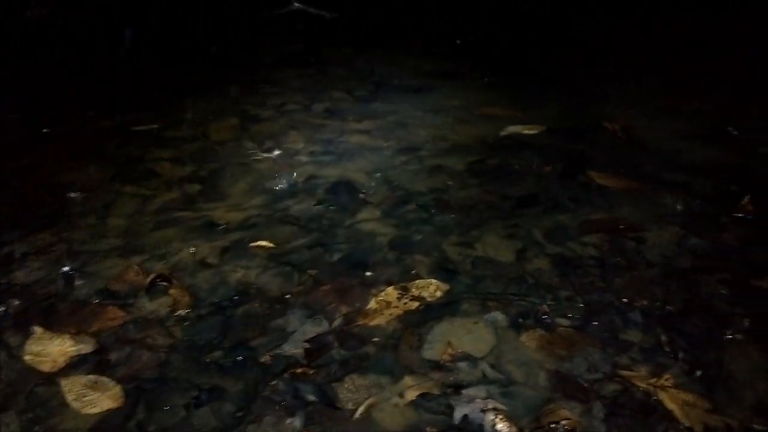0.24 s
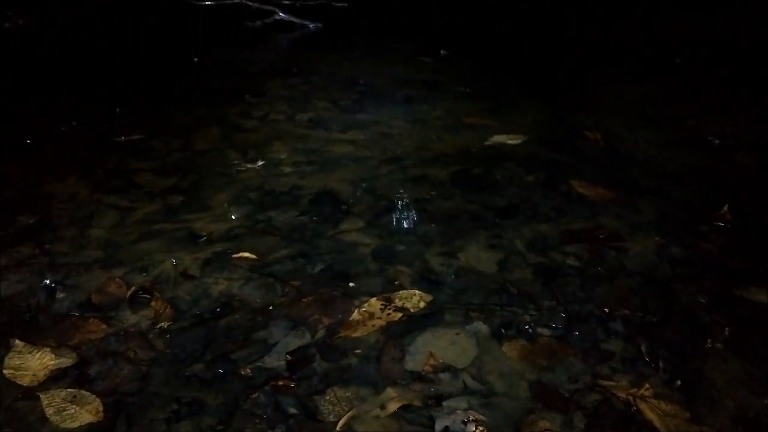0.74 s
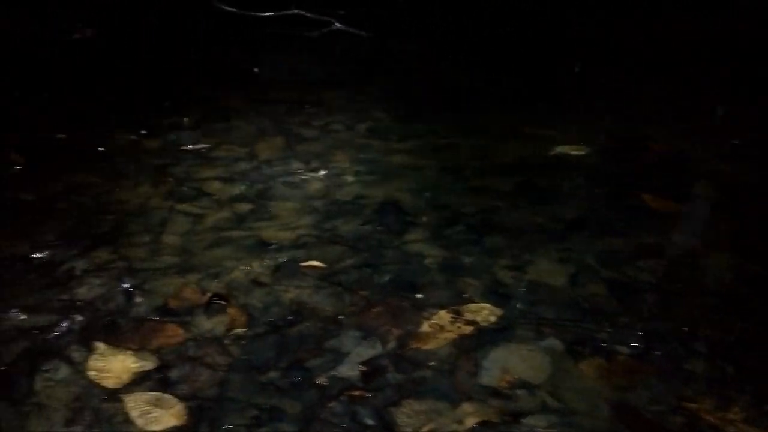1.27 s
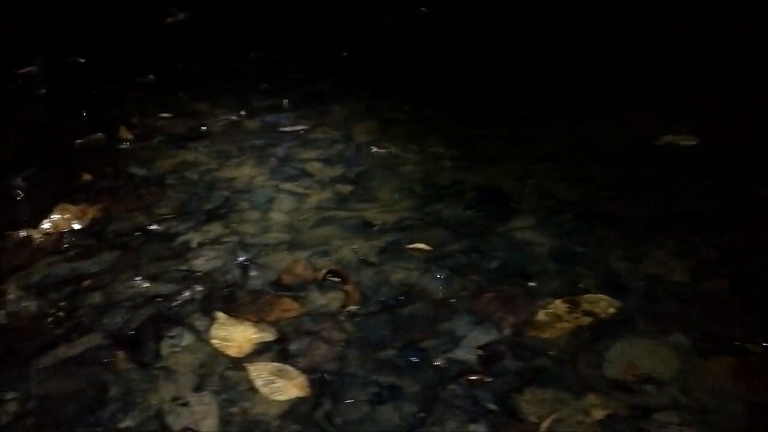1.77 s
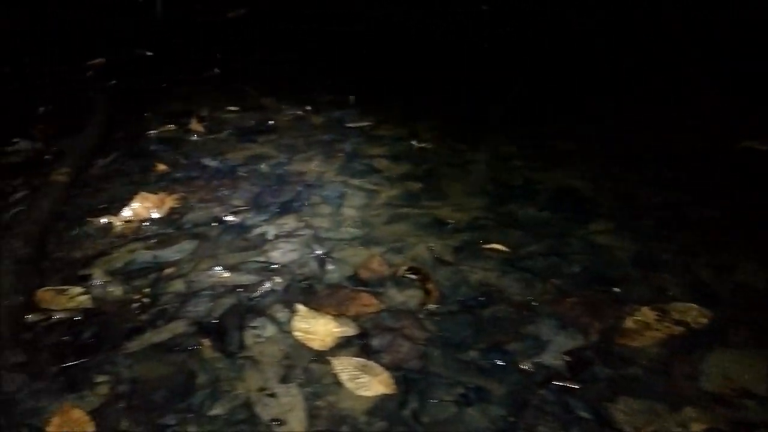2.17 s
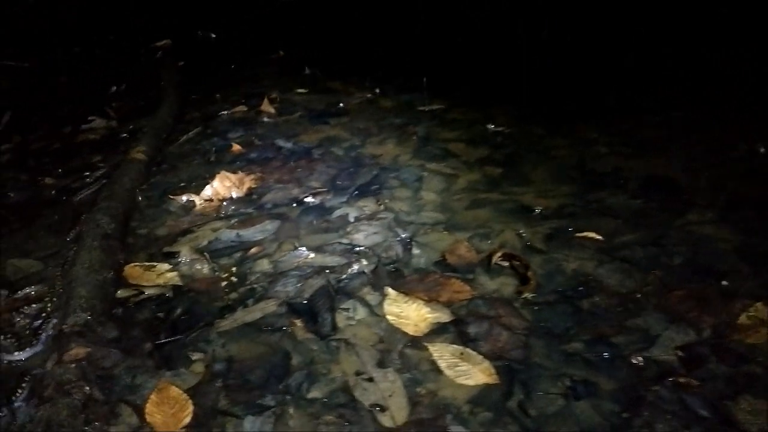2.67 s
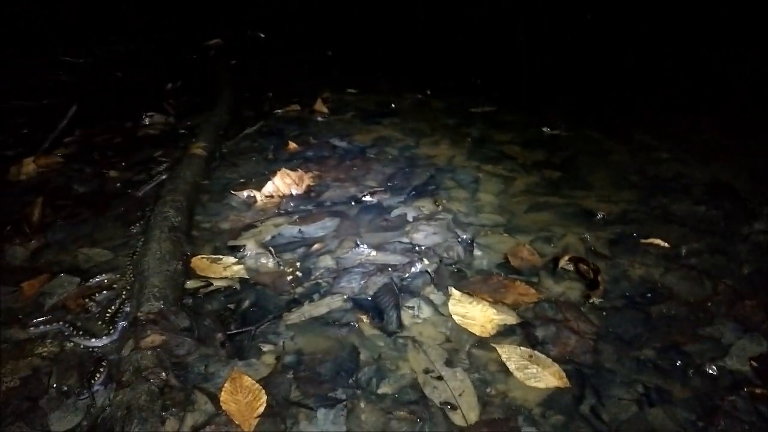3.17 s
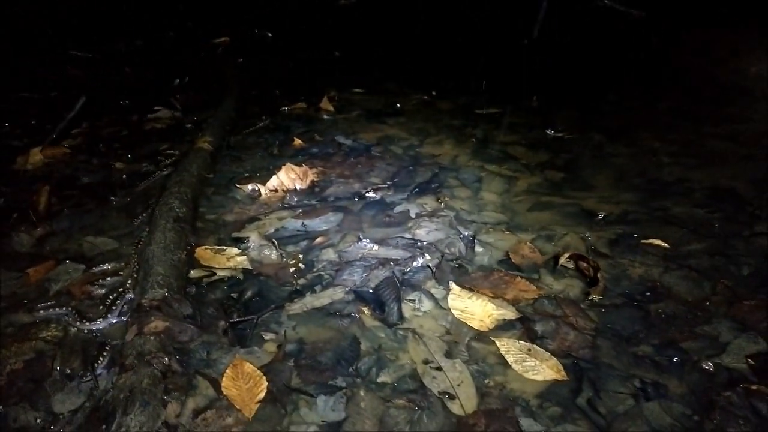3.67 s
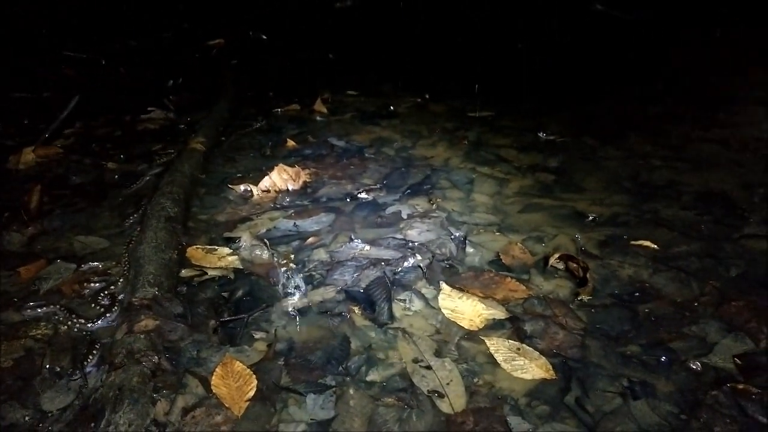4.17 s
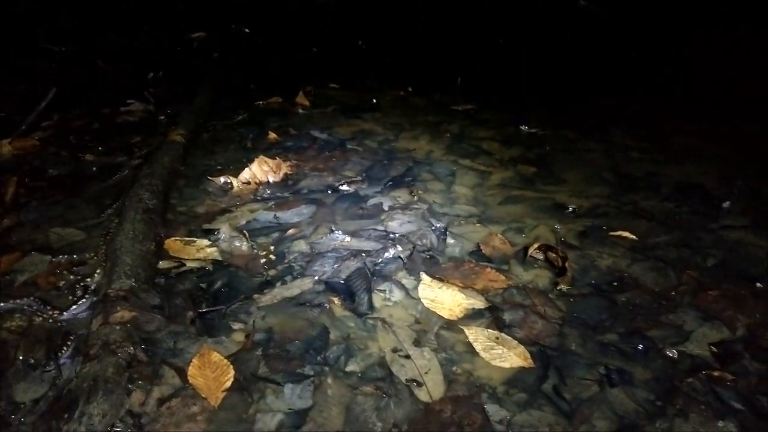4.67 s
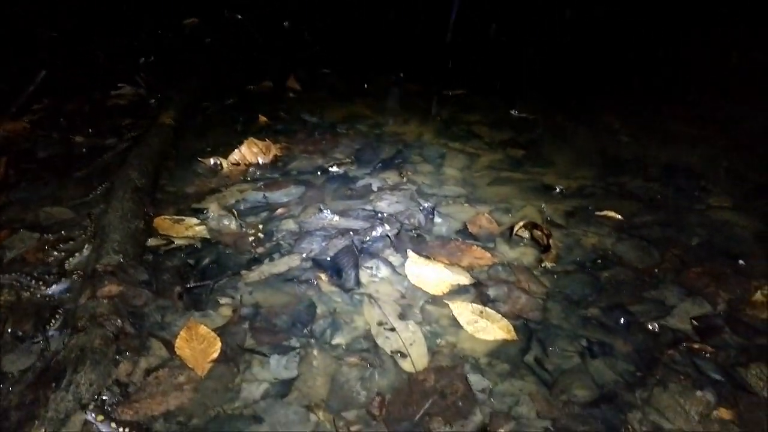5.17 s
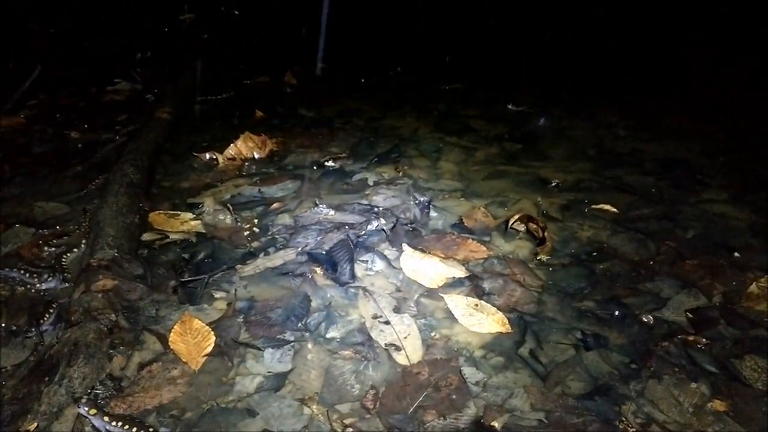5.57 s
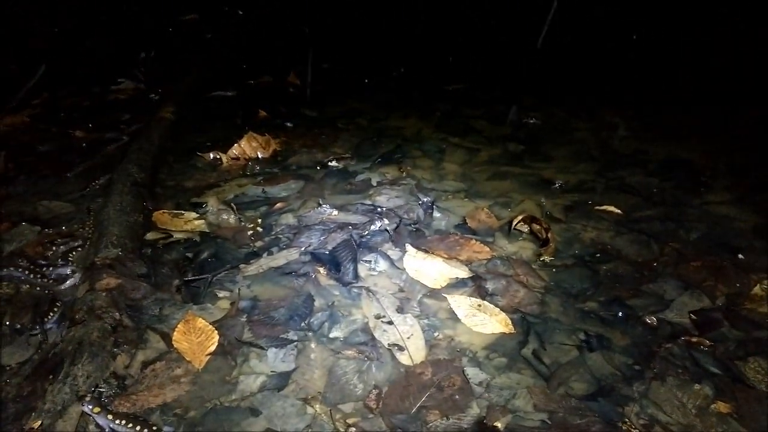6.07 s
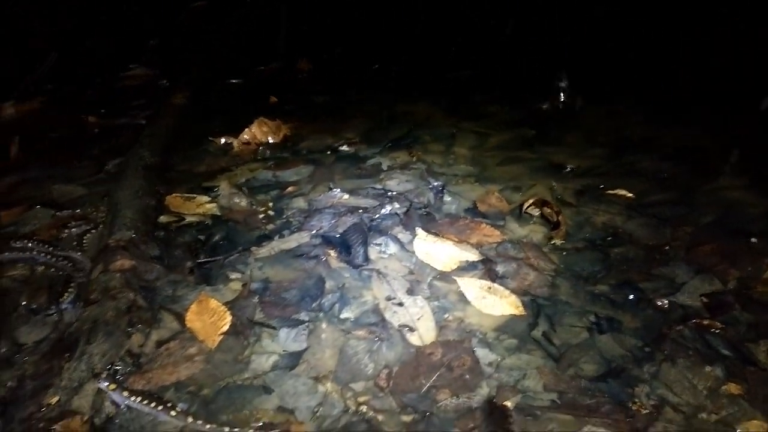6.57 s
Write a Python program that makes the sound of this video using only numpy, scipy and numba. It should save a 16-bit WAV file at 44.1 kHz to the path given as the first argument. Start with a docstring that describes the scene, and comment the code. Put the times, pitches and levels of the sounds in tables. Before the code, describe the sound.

Wood frogs chuckle in short throaty clucks at a woodland pool at night while raindrops tick and thud close by over soft pattering rain.

```python
"""A soft hiss, a low distant rumble and pattering fine rain come first, with a faint murmur; then drops
tick and thud close by, and wood frogs chuckle at a woodland pool at night, others fainter.
The hiss is banded noise, the patter a spray of tiny tones, and each drop a burst of ringing impacts.
Each chuckle is a short run of throat pulses ringing the vocal sacs; each near note has its own
left-right lag, as a hand-held phone slowly turns. Echoes from the woodland follow frogs and drops."""
import sys
import numpy as np
from scipy import signal
from scipy.io import wavfile
from scipy.ndimage import uniform_filter1d
from numba import njit

SR = 44100
rng = np.random.default_rng(int(sys.argv[2]) if len(sys.argv) > 2 else 0)


def bounce(signal):
    """Save signal as a 16-bit WAV file at the path given by the first command-line argument."""
    frames = np.transpose(np.atleast_2d(signal))
    limited = np.clip(frames, -1, 1)
    pcm = np.round(limited * 32767).astype(np.int16)
    wavfile.write(sys.argv[1], SR, pcm)


N = 301203  # length in samples

# Far rain and rumble, loudness across pitch: f/Hz, relative level/dB per Hz
HISS_COLOUR = [(18, -46), (30, -16), (84, 3.5), (112, 6.5), (313, -6), (691, -1), (789, -5), (1080, -2.5),
               (1650, -0.5), (4860, -12), (6000, -9), (7410, -4), (8600, -11.5), (9650, -18.5), (11900, -7),
               (13300, -19.5), (15600, -28), (16400, -70)]
HISS_DB = -54  # average level of the whole wash
# How alike left and right are in the wash: f/Hz, likeness (1 same, -1 opposite)
ALIKE = [(30, 0.6), (70, 0.98), (140, 0.92), (300, 0.71), (700, 0.25), (1400, -0.5), (3000, 0.46),
         (15000, 0.59)]
# How rain leans to one side: f/Hz, left minus right/dB
RAIN_LEAN = [(3000, -0.5), (5000, 5), (8000, -9.5), (15000, -1)]
# Slow rise and fall of the weather; only changes about the middle value count:
# t/s, rain level/dB, rumble level/dB
WEATHER = [(0.0, -54.5, -58.5), (0.36, -56, -66), (0.7, -56.5, -62.5), (0.84, -55, -60), (1.43, -58.5, -67),
           (1.84, -57, -65.5), (2.28, -57.5, -65), (2.85, -57, -64.5), (3.31, -58.5, -67), (3.73, -56, -67),
           (4.43, -58, -62.5), (4.6, -58.5, -59), (5.1, -56.5, -65.5), (5.95, -57.5, -61),
           (6.37, -56, -63.5), (6.56, -54, -55.5), (6.83, -57, -62.5)]

# Soft lead-in murmurs with the mouth shut:
# t/s, length/ms, base level/dB, base f/Hz, glide over the note/%, left lags by/ms
MURMURS = [(0.0, 60, -51.5, 363, -8.5, -0.2), (0.297, 42, -47, 401, -10, -0.27),
           (0.585, 65, -42, 330, 18, -0.25), (0.882, 46, -35.5, 336.5, 1, -0.26),
           (1.228, 34, -48.5, 349, -43, 0.16), (1.85, 47, -54, 317, 1, -0.067),
           (5.075, 62, -53.5, 299.5, -7, 0.43), (5.48, 34, -51.5, 322, -29, 0.39),
           (5.825, 63, -40.5, 334, -14.5, 0.16)]
# Tones stacked in each murmur: multiple of its pitch, level/dB
MURMUR_PARTIALS = [(1, -23), (2, -1), (3, -5), (4, -6.5)]
MURMUR_PEAK = 0.61  # loudest at this share of the length
MURMUR_ARCH_PERCENT = 2.9  # pitch bulge in the middle

# Near drops: t/s, tick level/dB, thud level/dB, snap level/dB, snap f/Hz, crack level/dB,
# left minus right of the treble/dB
DROPS = [(0.059, -26.5, -21.5, -31.5, 3180, -31, -17), (0.0654, -46, -42, -48, 3540, -55, -3),
         (0.1097, -47, -48, -50, 2200, -40, -7), (0.1688, -28, -19.5, -30, 3160, -36, -3),
         (0.1825, -38, -45, -39.5, 2460, -42, -5), (0.249, -64, -53, -48.5, 2170, -70, -2),
         (0.4195, -42, -46, -42.5, 2690, -44, -5), (0.4378, -40, -46, -46, 5190, -41.5, -9),
         (0.4738, -44, -56, -47, 5770, -42, -10), (0.4997, -47, -51, -45, 2420, -45, 10),
         (0.5076, -40, -60, -52, 4300, -38, -15), (0.5583, -43, -49, -50, 2210, -48, -8),
         (0.5758, -49.5, -54.5, -47.5, 3900, -63, -5), (0.6811, -54, -33, -58, 5710, -43, -5),
         (0.7236, -46, -44, -36, 2200, -47, 7), (0.7446, -36, -23, -42, 2180, -43, -12.5),
         (0.786, -58, -30, -55, 2930, -57, -6), (0.8267, -45, -41, -53, 2420, -47, -11),
         (0.835, -44, -47, -52, 2660, -43, -7), (0.8517, -44, -52, -47, 2420, -51, -11),
         (0.8644, -47, -50, -43.5, 2200, -51, -14), (0.9122, -49, -38, -43.5, 3900, -34, -5),
         (0.936, -40, -37.5, -47, 3900, -44, -1), (0.9699, -39.5, -37, -41.5, 3520, -44, -4),
         (1.0626, -42, -75, -55, 5710, -41, -4), (1.176, -71, -44, -53.5, 5740, -59, -22),
         (1.477, -44, -50, -39.5, 2400, -51, 0), (1.5968, -46, -47, -53, 5670, -50, -11),
         (1.6168, -51, -73, -55, 5710, -52, -17), (1.6288, -38.5, -39, -50, 2930, -48, -11),
         (1.677, -27, -23.5, -41, 5740, -36, -8.5), (1.751, -39, -58, -55, 5710, -43, -14),
         (1.796, -49, -51, -44.5, 2950, -63, -6), (1.9038, -47, -56, -47, 2680, -47, -10),
         (1.944, -36, -32, -48, 3960, -41.5, -9), (2.086, -41, -46, -54, 5710, -44, -7),
         (2.093, -38.5, -43, -62, 4720, -31, -2), (2.1433, -33, -47, -42, 4230, -42, -3),
         (2.1547, -43, -60, -61, 4290, -51, -11), (2.1873, -56, -38, -60, 2420, -53, -9),
         (2.225, -48, -39, -59, 3900, -59, -6), (2.5476, -39.5, -54, -39.5, 3040, -43, -7),
         (2.555, -43, -57, -63, 2660, -46, -4), (2.5824, -45, -43, -57, 5710, -60, -15),
         (2.59, -42, -61, -48, 5190, -48, 0), (2.6286, -44, -41, -48, 2200, -44, -9),
         (2.6361, -43, -55, -51, 2420, -42, -10), (2.7035, -34.5, -86, -42.5, 4720, -60, -15),
         (2.7263, -47, -62, -45, 5660, -35, 0), (2.7332, -33.5, -72, -35, 3760, -45, -8),
         (2.7455, -43, -45, -45, 5600, -37, -5), (2.8782, -39.5, -43.5, -56, 5710, -36.5, 0),
         (2.9242, -37, -55, -53, 4330, -33, 2), (2.9716, -52, -67, -42, 2200, -56, -7),
         (3.0082, -47, -35.5, -48.5, 2200, -50, -12), (3.039, -43.5, -40, -66, 2660, -43, -5),
         (3.3966, -39, -54, -44.5, 5710, -42, -3), (3.4351, -40.5, -58, -61, 5710, -35, -2),
         (3.4531, -37, -66, -45.5, 3270, -31.5, -5), (3.5864, -45, -38.5, -41.5, 3660, -45, -6),
         (3.596, -44, -49, -65, 5710, -49.5, -11), (3.6257, -60, -44, -68, 4290, -63, -4),
         (3.6315, -46, -52, -50, 2430, -53, -11), (3.6623, -43, -46, -58, 5710, -57, -13),
         (3.8105, -39, -59.5, -64, 5710, -41, -4), (3.817, -42, -59, -65, 5710, -54.5, -2),
         (3.823, -37, -64, -54, 4720, -38, -9), (3.9455, -61, -58, -46.5, 3860, -60, -4),
         (4.0522, -46, -52, -44, 2200, -61, -7), (4.0931, -33, -23.5, -50, 5600, -41, -9),
         (4.1548, -46, -68, -51, 3220, -52, -13), (4.1816, -44, -54, -47, 2200, -42, 1),
         (4.1987, -46, -25.5, -46, 3540, -51, -13), (4.212, -58, -66, -38, 2240, -59, -9),
         (4.2439, -28.5, -27, -34, 5740, -33, -9), (4.286, -43, -39, -44, 5710, -54, 0),
         (4.4738, -43, -50, -61, 4290, -53, -4), (4.4894, -42, -59, -51, 5710, -54, -5.5),
         (4.5445, -19, -20.5, -26, 2300, -26, -13), (4.6248, -50, -48, -50, 5710, -53, -1),
         (4.6697, -41, -40, -38, 2180, -55, -10), (4.712, -44, -40, -46, 2930, -47, -11),
         (4.754, -50, -34, -52, 2200, -51, -13), (4.773, -51, -37.5, -44.5, 2210, -56, -7),
         (4.8097, -34.5, -39.5, -38.5, 5670, -39, -1), (4.9389, -29, -25.5, -40, 5500, -33, -3),
         (5.0916, -33, -56, -49, 5710, -43, -12), (5.1134, -38, -48, -52.5, 3900, -57, -4),
         (5.1898, -41, -42, -52, 5740, -48, -6), (5.274, -64, -44, -50, 3220, -60, -7),
         (5.2895, -48, -44, -46, 5710, -47, 0), (5.2973, -35, -49, -44, 2200, -42, -1),
         (5.368, -52, -60, -48, 2420, -60, -4), (5.4044, -35, -51, -40, 5640, -48, -1),
         (5.4263, -43, -52, -45, 3540, -41, -6), (5.5132, -42, -44, -46, 5800, -39.5, 2),
         (5.773, -47, -36.5, -53, 5190, -57, -12), (5.8506, -44, -47, -52, 3500, -44, -5),
         (5.876, -45, -46, -49, 5140, -51, -3), (6.0437, -45.5, -36.5, -36.5, 2930, -46, -22),
         (6.0839, -41, -53, -37, 3780, -36, -5), (6.1925, -35, -42, -46.5, 5900, -32.5, -10),
         (6.212, -47, -64, -54.5, 4720, -41, 5), (6.247, -68, -61.5, -72, 3220, -48, -11),
         (6.3035, -42, -46, -44.5, 2680, -46, 1), (6.3136, -42.5, -52, -59, 2200, -59, -14),
         (6.3654, -39, -47, -37.5, 3900, -42, -1), (6.3758, -45, -42, -38.5, 2160, -54, -14),
         (6.4214, -31, -27, -55, 5710, -26.5, 3), (6.4428, -23, -22, -37, 2220, -36, -7),
         (6.4807, -23.5, -20.5, -29.5, 2620, -32, -8.5), (6.5177, -38, -45, -43, 2200, -52, -14),
         (6.5335, -39, -43, -51, 2420, -51, -2), (6.5476, -36, -43, -47, 2200, -31.5, -9),
         (6.6535, -26, -38, -41, 5710, -32, -6), (6.7215, -27, -54, -42.5, 5710, -37.5, -6.5),
         (6.7335, -42, -60, -44.5, 3500, -47, -17)]
# Ways a struck wet surface rings, from sharp tick to deep thud, knock and bright crack:
# f/Hz, level within the kind/dB, time to fade by 60 dB/ms
TICK = [(6500, -7, 8.4), (7130, 8, 3.46), (7860, 7.5, 3.63)]
THUD = [(113, -17.5, 14.7), (263, -36, 3.3), (387, -11, 16.7), (540, -5, 12.4)]
KNOCK = [(744, -0.41, 15), (1410, 0.34, 15), (1950, 0.65, 8.3)]
CRACK = [(10220, 14, 1.64), (11800, 16, 1.53), (14000, 0, 1.1), (15200, 1, 1.5)]
# Snap ringing: multiple of the drop's snap f, level within the kind/dB, time to fade by 60 dB/ms
SNAP = [(0.8, 16, 2.6), (1.0, 12, 5.23), (1.27, 17, 1.9)]
DROP_LAG_MS = -0.19  # left lags by this, before scatter
DROP_TAIL_T60_S, DROP_TAIL_DB = 0.056, -7

# Near frog notes: t/s, length/ms, base level/dB, base pulse rate f/Hz, high ring f/Hz,
# high ring over low ring level/dB, left lags by/ms, level change over the note/dB,
# rasp f/Hz, rasp base level/dB
NOTES = [(0.068, 20, -38, 376.0, 1250, 11, -0.23, -2, 3800, -54),
         (0.12, 24, -27.5, 435.5, 1330, 9.0, -0.22, -7.5, 3230, -46),
         (0.353, 22.5, -40, 265, 1210, 6, -0.23, -2.5, 3430, -57),
         (0.414, 27.6, -27.5, 421.0, 1334, 10.5, -0.25, -11, 3820, -46),
         (0.499, 24, -46, 475, 1340.0, 27.0, -0.41, -3, 2680, -55),
         (0.67, 16.6, -29.0, 264.4, 1380, 11, -0.28, -2, 2800, -52),
         (0.72, 18.6, -21.5, 441.5, 1390, 12.5, -0.23, -10.5, 2930, -38),
         (0.7602, 13, -31.0, 221.5, 1330, 7, 0.04, 0, 2720, -59),
         (0.821, 29, -25.0, 402, 1260, 13, 0.093, -9, 2750, -51),
         (0.862, 34, -47, 377.5, 1330.0, -7.0, -0.23, -2, 2900, -55),
         (0.925, 9.2, -31, 295, 1400.0, 12, -0.35, -1, 3500, -60),
         (0.959, 17, -23.5, 261, 1360, 17, -0.24, -3.5, 2800, -53),
         (1.002, 25.0, -18, 443, 1670, 13, -0.22, -14.5, 3060, -31),
         (1.09, 25, -47.5, 394, 1340, 7.0, -0.19, 0, 3300, -50),
         (1.271, 33.0, -37.0, 352, 1370.0, 13, -0.32, -4, 3520, -57),
         (1.298, 35.0, -31, 413.7, 1380.0, 15, 0.22, -5.5, 3000, -50.5),
         (1.497, 44.0, -53.0, 407, 1200, 7.0, -0.08, 0.5, 3800, -56),
         (1.572, 16.3, -51.5, 408, 1400.0, 3, -0.083, -4, 3100, -57),
         (1.622, 21.4, -49, 427.0, 1210, 5, 0.01, -4, 2900, -54),
         (1.684, 24.8, -31, 405, 1264, 7.5, 0.073, -7.5, 3620, -47),
         (1.936, 9.9, -40, 268, 1410.0, 4, 0.029, 1, 3770, -63),
         (1.993, 26.5, -29, 420.5, 1420, 13.5, -0.077, -7.5, 2770, -53),
         (2.205, 17.5, -54.5, 330, 1300.0, 2, 0.065, 1, 3800, -56),
         (2.254, 28.6, -36.0, 405, 1360, 8.5, 0.38, -6.5, 2900, -54),
         (2.614, 19, -39.5, 367, 1370.0, 15, 0.22, 0, 3300, -58),
         (2.669, 23.6, -31.5, 433, 1410.0, 14, 0.28, -7.5, 2640, -48),
         (3.261, 18, -51, 389, 1270.0, 1, 0.32, 0.5, 3400, -65),
         (3.312, 23, -37, 395, 1340.0, 10.0, 0.42, -7.5, 2720, -54),
         (3.337, 28.0, -31, 410.6, 1410.0, 13.5, 0.33, -4, 2620, -55),
         (3.85, 25.5, -41.5, 393.0, 1590, 8, 0.42, 0, 3700, -57),
         (3.968, 20, -40.5, 514, 1560, 17, 0.41, -2, 2660, -57),
         (4.026, 24.4, -33.5, 392, 1630, 10, 0.44, -7.5, 2670, -56),
         (4.128, 15, -41.0, 346, 1390.0, 10, 0.26, -0.5, 3000, -61),
         (4.177, 23, -31, 334, 1430, 13.0, 0.28, -8, 2720, -55),
         (4.537, 30.5, -37.5, 519, 1710, 5.5, -0.28, -5.5, 2700, -55),
         (4.609, 24, -37.5, 276.5, 1460, 7, 0.21, 0, 3300, -56),
         (4.629, 22, -34.0, 393.0, 1380.0, 12.0, 0.35, -4, 2900, -60),
         (4.67, 29.6, -27.5, 394, 1330, 14, 0.25, -8.5, 2700, -53.5),
         (4.735, 23.7, -26.5, 366, 1380, 10.5, 0.28, -12, 2660, -46),
         (5.17, 23, -50, 309.0, 1450.0, 10, 0.35, -6, 3380, -59),
         (5.233, 31.0, -34, 423, 1540, 8.0, 0.39, -9, 2940, -58),
         (5.269, 22.0, -51.5, 404, 1690, -3, 0.46, 0, 3000, -61),
         (5.327, 22.0, -38, 408, 1390, 8, 0.42, -5.5, 2800, -61),
         (5.547, 22, -39.5, 345, 1330, 4.5, 0.49, -4, 2900, -57),
         (5.597, 33, -35, 413.0, 1250.0, 6, 0.42, -5.5, 2730, -58),
         (5.638, 13.4, -39.0, 299.0, 1500.0, 4, 0.01, -0.5, 2800, -60),
         (5.695, 27.4, -28.0, 426, 1520, 15, 0.13, -6, 2720, -56),
         (5.73, 14.4, -40.0, 416, 1760.0, 8, 0.15, -1, 2800, -53),
         (5.767, 54, -57, 327, 1500, 7, -0.23, 6, 2700, -64),
         (5.913, 15.0, -29.5, 275.5, 1480, 14, 0.13, -1, 2900, -50),
         (5.971, 30, -21, 396, 1450, 12, 0.21, -14.5, 2720, -37),
         (6.025, 27.4, -29.5, 403.5, 1320, 12, 0.38, -8, 2700, -68),
         (6.284, 29.0, -44.5, 463, 1380.0, 6, 0.52, -2, 2900, -60),
         (6.318, 51, -41, 503, 1360, 7.0, 0.42, -5, 2800, -56),
         (6.377, 25, -26, 418.0, 1340, 5.5, 0.46, -12, 2820, -52),
         (6.432, 13, -31, 440.0, 1420, 9, 0.2, -5, 2700, -53),
         (6.443, 13.7, -27.5, 237.5, 1290, 7, 0.18, 0, 3300, -52),
         (6.498, 22.5, -22.0, 430.4, 1355, 9, -0.06, -11, 3540, -38.5),
         (6.531, 10.4, -39, 470, 1460.0, -24, 0.46, -3.5, 3400, -56),
         (6.57, 24.4, -41.5, 444, 1430, 8, 0.49, 0.5, 3000, -54),
         (6.626, 40, -41.5, 481, 1460, 11, 0.51, -5, 2710, -55)]
# Sac ringing after each pulse, time to fade by 60 dB: low ring/ms, high ring/ms
SAC_T60_MS = (13.6, 9.73)
# Weak upper ring shared by all frogs: f/Hz, base level/dB, time to fade by 60 dB/ms
OVERTONE = (2360, -15, 6.2)
RASP_T60_MS = 6.4
SLOW_HZ = 300  # below this rate pulses are less even; up to it the low ring rests

# Faster pulses sag more, and so do harder notes
SAG_FROM_HZ, SAG_PERCENT_PER_HZ, SAG_RANGE_PERCENT = 312, 0.17, (5.8, 21.2)
SAG_PERCENT_PER_DB = 1.27
# Weaker notes creak longer before they speak
CREAK_MS, CREAK_MS_PER_DB, CREAK_BELOW_DB = 5.45, 0.96, -30.5
# Left minus right level, and its change with the lag
FROG_LEAN_DB, FROG_LEAN_DB_PER_MS = 1.5, 2
# The low ring follows the pulse rate, but rests for the fastest and slowest pulses
LOW_RING_PER_PULSE, LOW_RING_RANGE_HZ, LOW_RING_REST_HZ = 1.998, (647, 923), 733

WOOD_T60_S, WOOD_DB, DROP_WOOD_DB = 0.19, -18, 1  # the last lifts the drops' share of the echoes
TOP_HZ = 16000


def undb(db):
    """Turn decibels into a plain gain."""
    return 10 ** (np.asarray(db) / 20)


def along(table, hz):
    """Read a (Hz, value) table between its points, with pitch spaced as the ear hears it."""
    points = np.array(table)
    return np.interp(np.log(hz), np.log(points[:, 0]), points[:, 1])


@njit
def ring(rows, n):
    """Fading sines that swell in softly, from rows (s, Hz, gain, t60 s, rise s), started between samples."""
    out = np.zeros(n)
    for s, hz, gain, t60, rise in rows:
        first = int(s * SR) + 1
        late = first - s * SR
        pole = np.log(.001) / (t60 * SR) + 2j * np.pi * hz / SR
        z, turn = gain * np.exp(pole * late), np.exp(pole)
        # what the swell still lacks shrinks at every sample
        lack, shrink = np.exp(-late / (rise * SR)), np.exp(-1 / (rise * SR))
        for i in range(first, min(first + int(t60 * SR), n)):
            if i >= 0:
                out[i] += z.imag * (1 - lack)
            z, lack = z * turn, lack * shrink
    return out


def pair(rows, rise_ms):
    """Rings at two microphone ports: rows (s, Hz, gain, t60 s, left minus right dB, left lags s)."""
    s, hz, gain, t60, pan_db, lag = np.transpose(rows)
    rise = np.full(len(s), max(rise_ms, .01) / 1e3)
    ports = []
    for side in (1, -1):
        port_gain = gain * undb(side * pan_db / 2)
        ports.append(ring(np.column_stack([s + side * lag / 2, hz, port_gain, t60, rise]), N))
    return np.array(ports)


def band(x, hz, width):
    """Keep the sound around one pitch with a gentle band-pass."""
    edges = [hz / width, min(hz * width, .48 * SR)]
    return signal.sosfilt(signal.butter(1, edges, "band", fs=SR, output="sos"), x)


def walk(rate):
    """A wandering level: random steps, rate per second, smoothed twice to a spread near 1."""
    k = int(SR / rate)
    steps = np.repeat(rng.standard_normal(N // k + 1), k)
    return 1.3 * uniform_filter1d(uniform_filter1d(steps, k), k)[:N]


def tail(x, t60_s, db, hz, width):
    """A fading spray of scattered arrivals after each sound, unlike left and right."""
    t = np.arange(int(t60_s * SR)) / SR
    noise = rng.standard_normal((2, SR // 2))[:, :len(t)]
    spray = band(noise * undb(-60 * t / t60_s), hz, width)
    spray *= undb(db) / np.sqrt(np.sum(spray ** 2, axis=1, keepdims=True))
    return signal.fftconvolve(x, spray, axes=1)[:, :N]


def hiss(rain_db, rumble_db):
    """Far rain and rumble blend into a nearly even wash: third-octave noise bands, each flickering slightly."""
    out = 0
    for hz in 32 * 2 ** np.arange(0, 9.1, 1 / 3):
        alike = np.clip(along(ALIKE, hz), -.95, .98)
        mid, side = (band(band(rng.standard_normal(N), hz, 1.225), hz, 1.225) for _ in range(2))
        lean = along(RAIN_LEAN, hz) * np.array([[.5], [-.5]])
        weather_db = rumble_db if hz < 250 else rain_db * (hz > 2500)
        db = along(HISS_COLOUR, hz) + walk(12) + lean + weather_db
        # the shared part goes to both sides, the other part with opposite signs
        stereo = np.sqrt(1 + alike) * mid + np.sqrt(1 - alike) * side * np.array([[1], [-1]])
        out = out + undb(db) * stereo
    return out * undb(HISS_DB) / np.sqrt(np.mean(out ** 2))


def patter(count=4500, size=6):
    """Fine rain on leaves and water: tiny ticks that ring a few short tones at once, some louder."""
    db, spread_db = -61, 3.8
    when, weight, side, centre = np.repeat(rng.random((count, 4)), size, axis=0).T
    pitch, cycles = rng.standard_normal(count * size), rng.random(count * size)
    hz = np.clip(5000 * 2.4 ** centre * np.exp(.45 * pitch), 500, 15800)
    colour = along(HISS_COLOUR, hz) - along(HISS_COLOUR, 8890.0) + 10 * np.log10(hz / 7300)
    gain = undb(db + colour - spread_db * np.log(weight + 0.00061))
    t60_s = (4 + 12 * cycles) / hz
    pan_db = along(RAIN_LEAN, hz) + 8 * (side - .5)
    lag_s = (side - .5) * 0.000994
    rows = np.column_stack([when * N / SR, hz, gain, t60_s, pan_db, lag_s])
    flurries = undb(walk(7) + 2.4 * walk(24))  # the rain comes in small flurries
    ticks = pair(rows, rise_ms=0.16) * flurries
    return ticks + tail(ticks, 0.11, -1.5, 8000.0, 3.8)


def murmurs():
    """Shut-mouth calls: grainy stacked tones that swell slowly, arch in pitch and stop sooner than they came."""
    out = np.zeros((2, N))
    waver, grain = 1 + .025 * walk(150), undb(2.5 * walk(200))  # unsteady pitch and level
    bend = np.log(.5) / np.log(MURMUR_PEAK)  # moves the loudest point
    for (s, ms, db, hz, glide, lag_ms), phase in zip(MURMURS, rng.random((len(MURMURS), 4))):
        u = np.linspace(0, 1, int(ms * SR / 1e3))
        arch = MURMUR_ARCH_PERCENT / 100 * (np.sin(np.pi * u) - .5)
        pitch_hz = waver[int(s * SR):][:len(u)] * hz * (1 + glide / 100 * (u - .5) + arch)
        turns = np.cumsum(pitch_hz) / SR
        shape = np.abs(np.sin(np.pi * u ** bend))
        tone = sum(undb(d) * np.sin(2 * np.pi * (k * turns + p))
                   for (k, d), p in zip(MURMUR_PARTIALS, phase))
        for side in (0, 1):
            first = max(round((s + (side == 0) * lag_ms / 1e3) * SR), 0)
            out[side, first:first + len(u)] += undb(db + (.5 - side) * FROG_LEAN_DB) * shape * tone
    return out * grain


def splat(s, levels_db, snap_hz, pan_db, chance, burst_ms=0.5933, detune=0.069,
          scatter_db=2.0, fall_db=-3.5, scatter_ms=0.19):
    """One drop: a quick burst of mostly weakening impacts, each ringing every mode a bit differently."""
    rows = []
    snap = [(k * snap_hz, db, t60) for k, db, t60 in SNAP]
    kinds = (TICK, THUD, KNOCK, snap, CRACK)
    pans_db = (pan_db, 0, 0, pan_db / 4, pan_db)
    for modes, db, pan in zip(kinds, levels_db, pans_db):
        for k, hit in enumerate(chance):
            late_ms = burst_ms * k * abs(hit[0, 0])
            for (hz, mode_db, t60), (side, tune, size) in zip(modes, hit[1:]):
                gain = undb(db + mode_db + scatter_db * size + fall_db * k)
                # the treble reaches each port by its own path
                lag_ms = DROP_LAG_MS + scatter_ms * side * (hz > 1300)
                rows.append((s + late_ms / 1e3, hz * (1 + detune * tune), gain, t60 / 1e3, pan, lag_ms / 1e3))
    return rows


def near_drops():
    """Drops that strike next to the phone: bursts of ringing that radiate little deep bass."""
    rows = []
    chance = rng.standard_normal((len(DROPS), 4, 6, 3))
    for (s, tick_db, thud_db, snap_db, snap_hz, crack_db, lean_db), c in zip(DROPS, chance):
        knock_db = (thud_db + snap_db) / 2
        rows += splat(s, [tick_db, thud_db, knock_db, snap_db, crack_db], snap_hz, lean_db, c)
    bass_cut = signal.butter(2, 110, "high", fs=SR, output="sos")
    return signal.sosfilt(bass_cut, pair(rows, rise_ms=0.65))


def drop_tails(drops):
    """A short bright noise tail that fades after each drop."""
    return tail(drops, DROP_TAIL_T60_S, DROP_TAIL_DB, 5800.0, 2.44)


def voiced(s, ms, db, rate_hz, high_hz, high_db, lag_ms, fade_db, rasp_hz, rasp_db):
    """Complete a note: creak, sag, low ring and lean follow from effort, pulse rate and direction."""
    creak_ms = 2.
    if rate_hz > SLOW_HZ:
        creak_ms = CREAK_MS + CREAK_MS_PER_DB * max(CREAK_BELOW_DB - db, 0)
    sag = np.clip(SAG_PERCENT_PER_HZ * (rate_hz - SAG_FROM_HZ), *SAG_RANGE_PERCENT)
    sag += SAG_PERCENT_PER_DB * (db - CREAK_BELOW_DB)
    low_hz = max(LOW_RING_PER_PULSE * rate_hz, LOW_RING_RANGE_HZ[0])
    if low_hz >= LOW_RING_RANGE_HZ[1] or rate_hz <= SLOW_HZ:
        low_hz = LOW_RING_REST_HZ
    lean_db = FROG_LEAN_DB + FROG_LEAN_DB_PER_MS * lag_ms
    return (s, ms, db, rate_hz, creak_ms, sag, fade_db, low_hz, high_hz, high_db,
            lean_db, lag_ms, rasp_hz, rasp_db)


def note(row, chance, dull_db=-10, swell_ms=5.1, lead_ms=4.84, lead_db=-10):
    """One chuckle: a lone weak pulse, then pulses that start creaky, speed up and sag as the sacs go slack."""
    (start, ms, db, rate_hz, creak_ms, sag, fade_db, low_hz, high_hz, high_db,
     pan_db, lag_ms, rasp_hz, rasp_db) = row
    jitter, uneven_db = .018 + .035 * (rate_hz < SLOW_HZ), 2.
    rows, t = [], -lead_ms  # t runs in ms from the first full pulse
    for wobble, size in chance:
        if t > ms:
            break
        done = max(t, 0) / ms
        slack = 1 + sag / 100 * (.45 - done ** 1.32)
        swell = (1 - 0.43 * np.exp(-max(t, 0) / swell_ms)) * undb(lead_db * (t < 0))
        gain = undb(db + uneven_db * size + fade_db * done ** 0.96) * swell
        top = undb(high_db + dull_db * done ** 2)  # the high ring dies first
        share = gain / np.hypot(1, undb(high_db))
        rings = [(low_hz * slack, 4.72 * share, SAC_T60_MS[0]),
                 (high_hz * slack * (1 + jitter * size), -5.6 * share * top, SAC_T60_MS[1])]
        overtone_db = OVERTONE[1] + .5 * (db + 24.0)  # harder calls ring brighter
        uppers = [(OVERTONE[0], overtone_db, OVERTONE[2]), (rasp_hz, rasp_db - db, RASP_T60_MS)]
        for hz, upper_db, t60 in uppers:
            rings.append((hz * slack ** 0.35 * (1 + jitter * wobble), 4.03 * gain * undb(upper_db), t60))
        rows += [(start + t / 1e3, hz, g, t60 / 1e3, pan_db, lag_ms / 1e3) for hz, g, t60 in rings]
        speed = 1 - .5 * np.exp(-((t + 2.584) / max(creak_ms, .3)) ** 2)
        gap_ms = 1e3 / (rate_hz * slack * speed) * (1 + jitter * wobble)
        t = t + gap_ms if t >= 0 else 0.
    return rows


def frogs():
    """The near callers: throat pulses ring the vocal sacs at the listed moments."""
    rows = []
    for row, c in zip(NOTES, rng.standard_normal((len(NOTES), 40, 2))):
        rows += note(voiced(*row), c)
    return pair(rows, rise_ms=0.65)


def far_frogs(count=45):
    """Faint callers across the pool: the same pulsed ringing at random moments."""
    base_db, spread_db = -62, 1.5
    draw, chance = rng.random((count, 6)), rng.standard_normal((count, 40, 2))
    rows = []
    for (a, b, c, d, e, f), luck in zip(draw, chance):
        db = base_db + spread_db * np.log(1 / c)
        # same order as the values that voiced returns
        call = (a * N / SR, 22 + 20 * b, db, 330 + 130 * d, 2 + 9 * e, 12, -8, 660 + 220 * d,
                1250 + 300 * b, -2 + 8 * e, 1., (f - .4) * 0.38, 3000, -90)
        rows += note(call, luck)
    return pair(rows, rise_ms=0.96)


def wood(x):
    """Echoes from trunks, banks and water, duller than the direct sound."""
    return tail(x, WOOD_T60_S, WOOD_DB, 1500.0, 3.4)


def scene():
    """Add up the frogs, drops, echoes and rain as they meet at the two ports."""
    s, rain_db, rumble_db = np.transpose(WEATHER)
    t = np.arange(N) / SR
    rain_db = np.interp(t, s, rain_db - np.median(rain_db))
    rumble_db = np.interp(t, s, rumble_db - np.median(rumble_db))
    callers = frogs() + murmurs() + far_frogs()
    drops = near_drops()
    tails = drop_tails(drops)
    echoes = wood(callers + undb(DROP_WOOD_DB) * drops)
    rain = undb(rain_db) * patter()
    return callers + drops + tails + echoes + rain + hiss(rain_db, rumble_db)


def record(dry):
    """The phone drops the deepest bass and cuts the top."""
    thin = signal.sosfilt(signal.butter(2, 60, "high", fs=SR, output="sos"), dry)
    return signal.sosfilt(signal.ellip(8, .2, 70, TOP_HZ, fs=SR, output="sos"), thin)


dry = scene()
out = record(dry)
bounce(out)
```